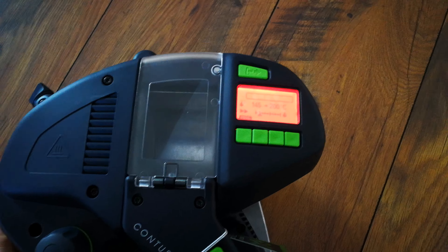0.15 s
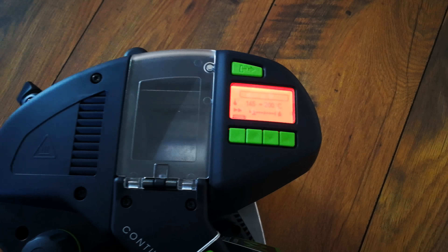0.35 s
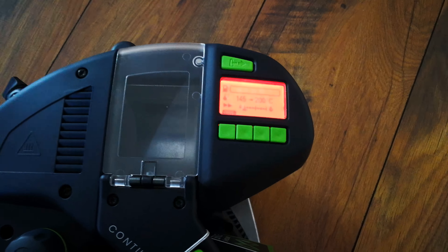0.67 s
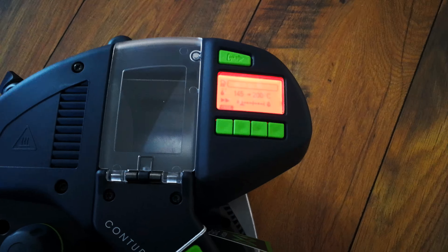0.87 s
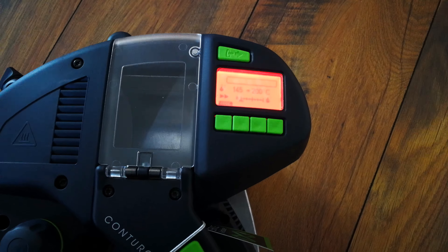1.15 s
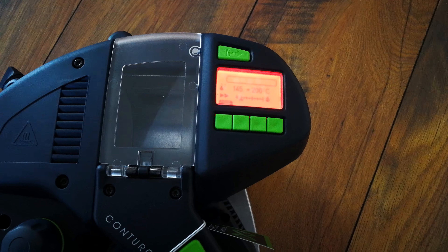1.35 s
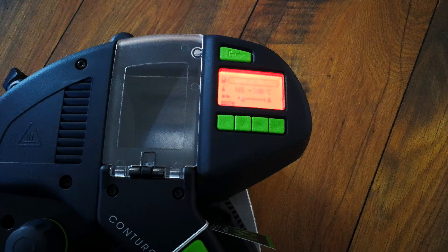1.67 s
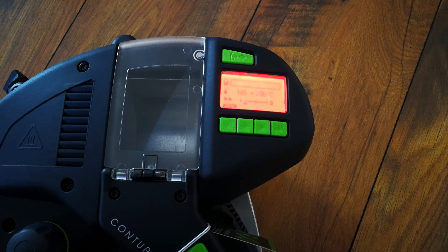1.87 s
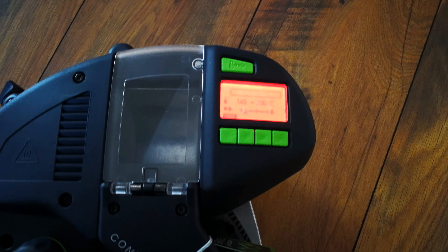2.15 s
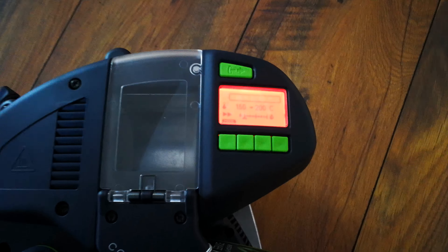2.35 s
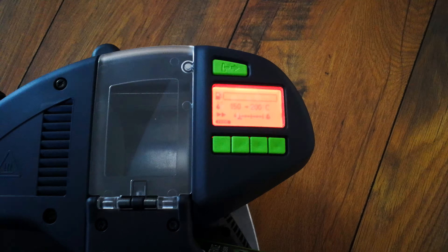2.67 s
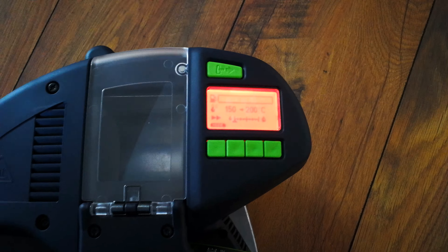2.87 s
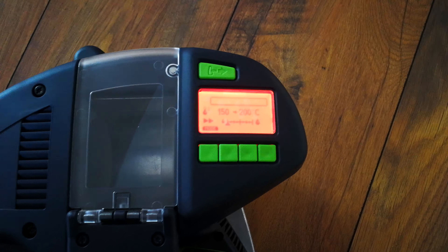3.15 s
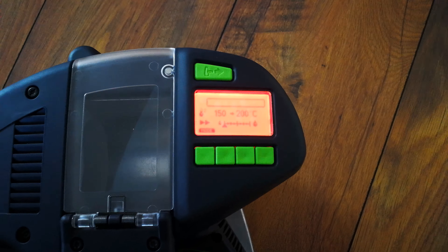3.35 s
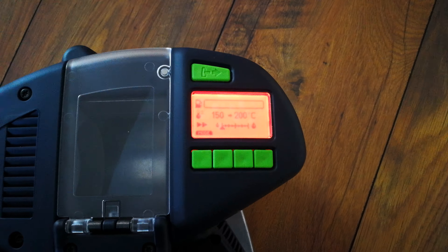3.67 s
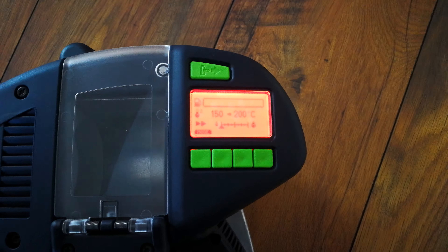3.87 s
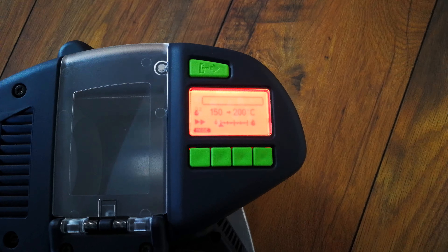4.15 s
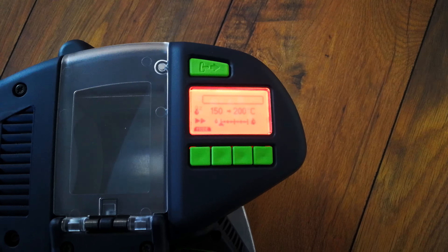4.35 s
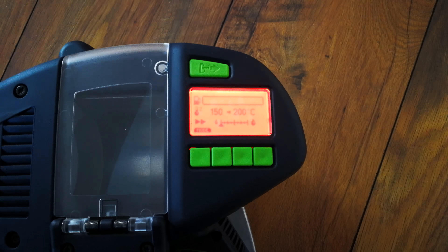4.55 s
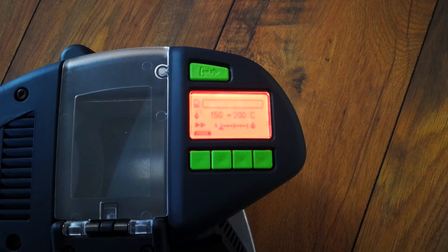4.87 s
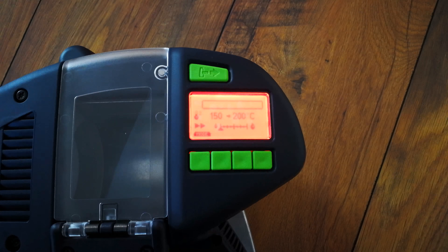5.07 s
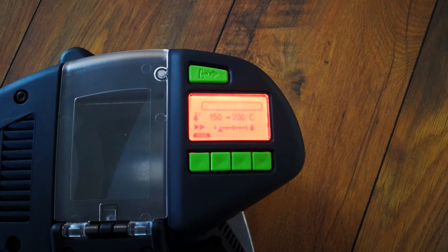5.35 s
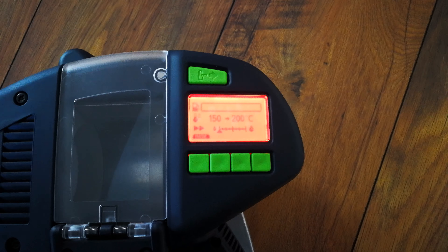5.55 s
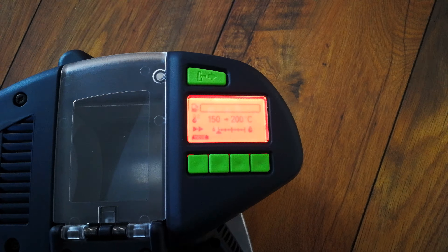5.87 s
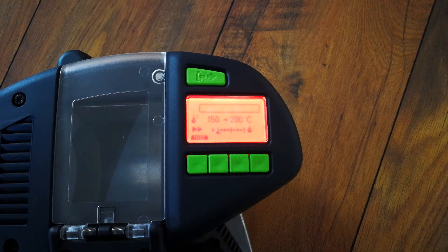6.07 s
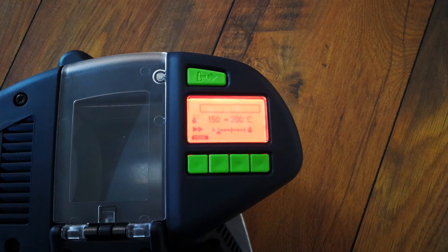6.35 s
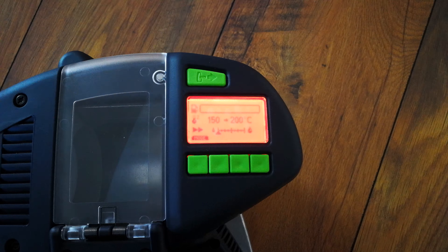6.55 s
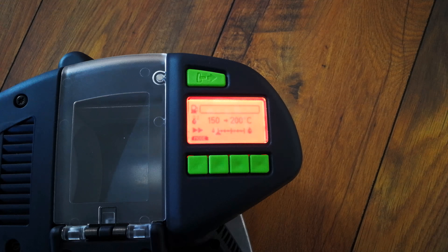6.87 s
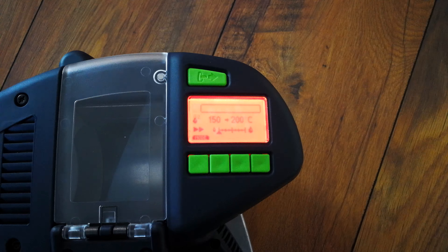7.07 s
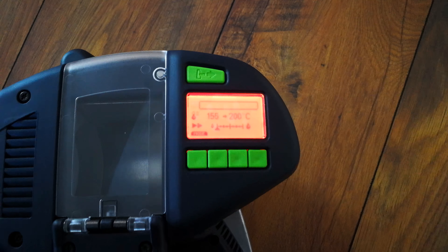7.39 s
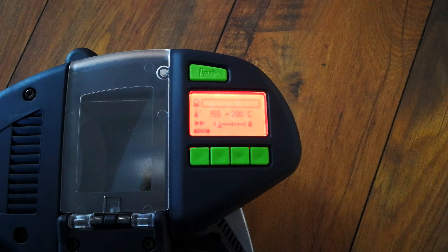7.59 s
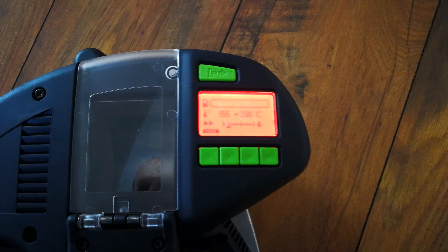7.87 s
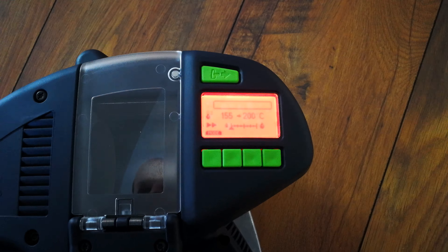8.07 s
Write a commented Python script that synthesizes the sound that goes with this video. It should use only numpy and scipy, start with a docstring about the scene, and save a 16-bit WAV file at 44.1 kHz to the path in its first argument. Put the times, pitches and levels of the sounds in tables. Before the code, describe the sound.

Small fans inside a plastic tool hiss steadily with a thin high whine, heard very close, after one soft low bump at the start.

```python
"""Two small fans whine and hiss inside a plastic tool on a wooden floor, heard by a phone held close above.
The whine is a set of pure tones at multiples of each fan's turning speed, shaken in level by gusts.
The hiss is random noise, coloured differently at the phone's two ports and shifting as the hand drifts.
Behind it lie low rumble, a wavering mains hum and buzz, and one bump of the hand on the phone."""
import sys
import numpy as np
from scipy.fft import rfft, irfft
from scipy.io import wavfile
from scipy.ndimage import uniform_filter1d

SR = 44100
rng = np.random.default_rng(int(sys.argv[2]) if len(sys.argv) > 2 else 0)


def file_out(sig):
    """Save sig as 16-bit WAV at sys.argv[1]."""
    # one column per channel
    cols = np.atleast_2d(sig).T
    # limit, then scale
    lim = np.clip(cols, -1, 1)
    pcm = np.round(lim * 32767).astype(np.int16)
    wavfile.write(sys.argv[1], SR, pcm)


N = 362502
T = np.arange(N) / SR  # time of each sample, s
HZ = np.arange(N // 2 + 1) * SR / N + 1e-3  # pitch of each frequency bin, kept above 0 for the logarithm

# In every table, port 0 is left and port 1 is right; a lead says how far the left port is ahead.

# --- room ---
MAINS_HZ, BUZZ_DB = 60, -78  # the buzz sounds at twice the mains pitch
RUMBLE_DB, SWELL_HALF_S = -79, .09
# low swells added to the steady rumble: [peak_s, peak_level_db]
RUMBLE_SWELLS = [(.11, -77), (1.37, -78), (2.15, -67), (3.57, -76), (5.24, -72), (6.2, -71), (6.66, -74),
                 (6.93, -65), (7.27, -65), (7.7, -76)]
# a hum that comes in, grows and stops
HUM_IDLE_DB, HUM_START_DB, HUM_RISE_DB_PER_S, HUM_WAVER_DB = -85, -76, 3, 2.5
HUM_ON_S, HUM_OFF_S, HUM_EDGE_S = 5.8, 7.83, .04
# one bump of the hand: [time_s, peak_level_db, push_length_s]
HAND_BUMP = (.1503, -50.5, .0017)
# steady bass noise of the room: [pitch_hz, level_db_per_hz]
ROOM_BASS = [(20, -110), (45, -97), (65, -95), (90, -99), (150, -104), (200, -130)]

# --- hiss ---
# air noise at each port before resonances: [pitch_hz, level_db_per_hz]
AIR_LEFT = [(150, -93), (300, -82), (450, -83.6), (600, -87.5), (800, -87.5), (1200, -83.2), (1800, -73.5),
            (2500, -71.5), (3500, -91), (5000, -90), (7000, -96.5), (10000, -97), (12500, -99.5),
            (15100, -106.1)]
AIR_RIGHT = [(150, -93), (300, -80.5), (450, -79.0), (600, -89.5), (800, -73.5), (1200, -79), (1800, -62.2),
             (2500, -73), (3500, -101.7), (5000, -90), (7000, -98.5), (10000, -85.5), (12500, -102.9),
             (15100, -105.8)]
# resonances and notches of housing, floor and phone body: [pitch_hz, width_hz, level_db]
RESONANCES_LEFT = [(237, 34, 3), (407, 41, 5.0), (961, 230, 7), (2180, 559, -13), (2296, 207, 10),
                   (3891, 480, 11), (4366, 423, -14), (4477, 609, 13.5), (10738, 3221, -7.5)]
RESONANCES_RIGHT = [(517, 104, -8.5), (1976, 56, -4.5), (2444, 269, -8), (2744, 490, -4), (3482, 278, 8),
                    (4561, 482, 6), (6522, 1148, 12), (9567, 532, -7.5), (10656, 527, -6)]
# standing waves between tool and floor: [port, pitch_hz, width_hz, level_db]
STANDING_WAVES = [(0, 330, 40, 2.2), (0, 640, 90, -.5), (0, 790, 60, 2.2), (0, 960, 90, 2.2),
                  (0, 1230, 80, 2.5), (0, 1380, 90, -2.2), (0, 1620, 100, 2.5), (0, 1700, 80, -1.5),
                  (0, 2190, 90, -1.7), (0, 2620, 70, -2.5), (0, 2790, 70, .5), (0, 3300, 90, 2.5),
                  (0, 5700, 1500, -.5), (0, 13300, 1500, 1), (0, 3130, 80, -2.2), (0, 6830, 250, 1.8),
                  (0, 7580, 300, 1.8), (0, 8630, 300, 2.5), (0, 9980, 300, 1.8), (1, 325, 40, 2.2),
                  (1, 612, 30, 4), (1, 650, 35, -6), (0, 650, 35, -4), (1, 720, 60, -2), (0, 4650, 300, 1),
                  (1, 950, 50, -3.5), (1, 1050, 60, 2), (1, 1125, 50, -5), (1, 1195, 60, 2.5),
                  (1, 1290, 60, -1.3), (1, 1720, 60, -2.2), (1, 1815, 80, 2.5), (1, 1925, 50, -2.5),
                  (1, 2020, 50, -3), (1, 2150, 60, -2.2), (1, 2080, 70, 2.2), (1, 2230, 70, 2.2),
                  (1, 4780, 120, -2.5), (1, 5950, 200, -2.5), (1, 7600, 600, 1.8), (1, 8230, 150, -2.2),
                  (1, 8700, 500, 1.5), (1, 12300, 300, 1.8), (1, 13900, 700, .9)]
# how alike the two ports are: [pitch_hz, likeness_0_to_1, lead_radians]
PORT_LIKENESS = [(60, .98, 1), (170, .95, 0), (350, .9, .1), (450, .82, .6), (560, .4, 1.53),
                 (700, .6, -0.2), (850, .66, 0.3), (1030, .52, 0), (1500, .68, 0.04), (2050, .25, 0.47),
                 (2300, .52, 1.57), (3200, .27, -0.1), (3850, .52, 1.5), (4150, .15, .5), (4550, .55, 1.6),
                 (5170, .15, 3), (6200, .35, 5.7), (7500, .28, 8.3), (8300, .15, 9), (8700, .45, 8.1),
                 (9350, .05, 7.5), (9900, .5, 7.3), (10800, .1, 8), (12000, .2, 9.4), (12550, .55, 9.4),
                 (13100, .1, 8.2), (13600, .25, 7.2), (15000, .05, 7)]

# --- the drifting hand ---
SLIDE_START_S, SLIDE_END_S = 2.0, 3.25  # the hand slides the phone over the grille once
# treble nearness around the slide: [before_db, after_db]
NEARNESS = (-1.05, .45)
# bands that follow the nearness: [port, pitch_hz, width_hz, slope_db_per_db]
NEARNESS_BANDS = [(0, 9000, 9000, 1.0), (1, 9000, 9000, 1.0), (1, 6500, 500, 1.1), (1, 7150, 350, -3.5),
                  (1, 1000, 150, -1.3), (1, 330, 200, .7), (0, 330, 200, .7), (0, 3200, 300, 1.6),
                  (0, 5700, 1500, .9), (0, 13300, 1500, 1), (1, 14000, 1200, 1.9), (0, 7900, 300, -.8),
                  (0, 2780, 80, -2.2), (0, 3370, 100, -1.2), (0, 1530, 80, 1), (1, 3760, 120, 1.5),
                  (1, 680, 120, 1.2), (1, 1875, 70, -2.2), (0, 2850, 70, -1.8), (1, 560, 90, .3)]
# change of the left hiss around 750 Hz: [time_s, level_db]
LEFT_LOW_HISS = [(0, -1.4), (1.5, -3.7), (3, -1), (4.1, 0), (5.7, 2.8), (7.5, -.1), (8.22, -.1)]
# change of the left hiss around 2400 Hz: [time_s, level_db]
LEFT_MID_HISS = [(0, -3), (1.9, -4.5), (2.5, 1), (3.4, 1.5), (5.5, 0), (8.22, 1)]
# hiss sharing the path of a nearby whine: [port, blade_multiple, pitch_hz, width_hz, share_of_db_change]
SHARED_PATHS = [(0, 2, 2070, 200, .35), (1, 2, 2050, 230, .42), (1, 2, 1875, 70, .45),
                (0, 3, 2920, 200, .3), (1, 3, 2970, 200, .5), (0, 4, 3900, 320, .8), (1, 4, 3850, 250, .5)]
WHINE_DIP_LIMIT_DB = -6  # a whine's dip below its mean counts only down to here for the hiss
FRESH_DB, FRESH_S = 3, .4  # the right hiss near 2100 Hz and the left near 3900 Hz start brighter, then settle
SWELL_DB, FLICKER_DB = .5, .9  # slow swelling around the whine, quicker flicker in the treble

# --- fans ---
BLADES = 7
SHAFT_HZ, SECOND_SHAFT_HZ = 139.04, 142.07  # turns per second
# whine of the first fan as the phone drifts:
# [time_s, multiple_2_left_db, multiple_2_right_db, multiple_3_left_db]
DRIFTING_WHINES = [(0, -50, -57, -64), (.25, -50, -54, -59), (.55, -48, -47, -54), (1.3, -47, -46, -58),
                   (1.75, -48, -48, -55), (2.25, -49, -46, -50), (2.9, -51, -39, -48.5),
                   (3.3, -53, -35, -48.5), (3.75, -53, -32.3, -54), (4.0, -55, -34, -59),
                   (4.48, -54, -35, -52), (4.73, -54, -37, -51), (6.0, -54.5, -37, -53),
                   (6.45, -54, -37, -57), (7.0, -54, -37, -52), (7.47, -51, -39, -57), (7.8, -50, -40, -53),
                   (8.22, -51, -41, -56)]
# whines set only by the slide, for multiple 3 right, 4 left and 4 right: [before_db, after_db]
SLIDE_WHINES = [(-57.5, -63), (-63.5, -58.7), (-83, -80)]
# blade tone of the second fan: [time_s, left_db, right_db, lead_radians]
SECOND_FAN = [(0, -53.5, -59, .7), (1.6, -55.5, -58, .7), (2.3, -54.5, -61, .7), (2.7, -52.5, -63, .5),
              (3.2, -54, -68, .3), (3.45, -59, -72, .2), (3.9, -59, -73, .1), (4.2, -54.5, -73, -.2),
              (5.6, -55.5, -73, -.1), (6.3, -53, -73, -.5), (6.8, -54.5, -73, -.5), (7.3, -58, -73, 0),
              (8.22, -57, -73, -.5)]
# lead for blade multiple 2: [time_s, lead_radians]
MULTIPLE_2_LEAD = [(0, 0), (1.2, -.35), (2.2, .1), (3.2, .2), (3.8, 0), (4.4, .2), (4.65, .85), (6, .65),
                   (8.22, .6)]
# lead for blade multiples 3 and 4 around the slide: [before_radians, after_radians]
SLIDE_LEADS = [(.65, 1.1), (-.8, 1.15)]
# weaker tones around the slide:
# [fan, shaft_multiple, left_before_db, left_after_db, right_before_db, right_after_db]
WEAK_TONES = [(0, 7, -68, -64.5, -69, -70), (0, 15, -78, -78, -70, -62), (0, 35, -80, -80, -80, -80),
              (0, 42, -83, -83, -79, -79), (1, 2, -73, -73, -73, -73), (1, 3, -71, -71, -71, -71),
              (1, 14, -78, -75, -60, -57), (1, 21, -73, -75, -82, -81)]
# The next three lists go: multiples 2, 3 and 4 of the first fan, then the second fan.
# strength of the gusts on each whine: [shake_db]
GUST_SHAKE = [.3, .7, 1.8, 1.2]
# pace of the gusts on each whine: [new_levels_per_s]
GUST_PACE = [14, 14, 30, 16]
# slow wander of each whine as the hand trembles: [wander_db]
HAND_WANDER = [.3, .6, .3, .6]

# --- phone ---
TOP_HZ, EDGE_HZ, EDGE_DB = 15640, 15150, -5


def undb(db):
    """Turn decibels into a plain gain."""
    return 10 ** (np.asarray(db) / 20)


def curves(table):
    """Join the points of each table column with straight lines over time."""
    s, *columns = np.transpose(table)
    return [np.interp(T, s, column) for column in columns]


def over_hz(table):
    """Join the points of each table column over pitch, on a log scale as in hearing."""
    hz, *columns = np.transpose(table)
    return [np.interp(np.log(HZ), np.log(hz), column) for column in columns]


def walk(rate):
    """Random level, drawn anew `rate` times a second and smoothed twice; its typical spread is 1."""
    hold = int(SR / rate)
    steps = np.repeat(rng.standard_normal(N // hold + 1), hold)
    smooth = uniform_filter1d(uniform_filter1d(steps, hold), hold)[:N]
    return smooth / smooth.std()


def white():
    """Spectrum of even noise at 0 dB per Hz."""
    return rfft(rng.standard_normal(N)) * np.sqrt(SR / 2)


def band(sound, hz, width):
    """Keep only a soft-edged band of a sound."""
    return irfft(rfft(sound) * np.exp(-2 * ((HZ - hz) / width) ** 2), N)


def slid(before, after):
    """Move smoothly from one value to the other while the hand slides the phone."""
    u = np.clip((T - SLIDE_START_S) / (SLIDE_END_S - SLIDE_START_S), 0, 1)
    return before + (after - before) * u ** 2 * (3 - 2 * u)


def rumble():
    """Very low noise, steady with short bell-shaped swells."""
    noise = band(rng.standard_normal(N), 32, 32)
    swells = sum(undb(db) * np.exp(-.5 * ((T - at) / SWELL_HALF_S) ** 2) for at, db in RUMBLE_SWELLS)
    return (undb(RUMBLE_DB) + swells) * noise / noise.std()


def mains_hum():
    """A tone near the mains pitch with unsteady level and phase: faint, then growing until it stops."""
    tone = undb(HUM_WAVER_DB * walk(8)) * np.sin(2 * np.pi * MAINS_HZ * T + 1.6 * walk(5))
    on = (np.tanh((T - HUM_ON_S) / HUM_EDGE_S) - np.tanh((T - HUM_OFF_S) / HUM_EDGE_S)) / 2
    growing = undb(HUM_START_DB + HUM_RISE_DB_PER_S * (T - HUM_ON_S))
    return (undb(HUM_IDLE_DB) + on * growing) * tone / tone.std()


def mains_buzz():
    """A tone at twice the mains pitch, its level wavering a little."""
    return np.sqrt(2) * undb(BUZZ_DB + 1.5 * walk(3)) * np.sin(2 * np.pi * 2 * MAINS_HZ * T)


def hand_bump():
    """The hand bumps the phone: one push in, then out."""
    at, peak_db, push = HAND_BUMP
    u = (T - at) / push
    return undb(peak_db) * u * np.exp(.5 - u ** 2 / 2)


def bass_floor():
    """Steady bass noise, mostly common to both ports with a little difference between them."""
    gain = undb(over_hz(ROOM_BASS)[0])
    common = irfft(white() * gain, N)
    difference = irfft(white() * gain, N)
    return common + .15 * difference * np.array([[1], [-1]])


def room():
    """All background sounds, nearly the same at both ports."""
    return rumble() + mains_hum() + mains_buzz() + hand_bump() + bass_floor()


def hiss():
    """Turbulent air, partly common to both ports, coloured by each port's resonances."""
    like, lead = over_hz(PORT_LIKENESS)
    like = np.clip(like, 0, 1)
    left = white()
    right = like * left * np.exp(-1j * lead) + np.sqrt(1 - like ** 2) * white()
    ports = ((left, AIR_LEFT, RESONANCES_LEFT), (right, AIR_RIGHT, RESONANCES_RIGHT))
    fall = 1 / np.sqrt(1 + (110 / HZ) ** 8)  # small fans give no deep bass
    out = []
    for port, (air, base, body) in enumerate(ports):
        modes = list(body) + [row[1:] for row in STANDING_WAVES if row[0] == port]
        db = over_hz(base)[0]
        for hz, width, mode_db in modes:
            db = db + mode_db / (1 + (2 * (HZ - hz) / width) ** 2)
        out.append(irfft(air * undb(db) * fall, N))
    return np.array(out)


def whines():
    """Left and right dB of blade multiples 2, 3 and 4, then of the second fan's blade tone."""
    return curves(DRIFTING_WHINES) + [slid(*row) for row in SLIDE_WHINES] + curves(SECOND_FAN)[:2]


def hand_moves():
    """List the bands that swell or sink as the moving phone shifts the standing waves."""
    near = slid(*NEARNESS)
    fresh = FRESH_DB * np.exp(-(T / FRESH_S) ** 2)
    moves = [(0, 750, 170, curves(LEFT_LOW_HISS)[0]), (0, 2400, 260, curves(LEFT_MID_HISS)[0])]
    moves += [(1, 2100, 250, fresh), (0, 3900, 320, fresh)]
    moves += [(int(port), hz, width, slope * near) for port, hz, width, slope in NEARNESS_BANDS]
    whine = whines()
    for port, multiple, hz, width, share in SHARED_PATHS:
        port = int(port)
        db = uniform_filter1d(whine[2 * (int(multiple) - 2) + port], SR // 2)  # smoothed over half a second
        moves.append((port, hz, width, share * np.maximum(db - db.mean(), WHINE_DIP_LIMIT_DB)))
    return moves


def restless_bands():
    """Bands of the hiss that rise and fall at random, each on its own but alike at both ports."""
    moves = []
    for hz in 3500 * 2 ** (np.arange(7) / 3):  # steps of a third octave
        flicker = FLICKER_DB * walk(11)
        moves += [(port, hz, hz / 6, flicker) for port in (0, 1)]
    for hz in range(1200, 2800, 200):
        swell = SWELL_DB * walk(2.5)
        moves += [(port, hz, 130, swell) for port in (0, 1)]
    return moves


def drifted(air):
    """Raise or lower single bands of the hiss over time by adding or taking away part of each."""
    out = air.copy()
    for port, hz, width, db in hand_moves() + restless_bands():
        out[port] += (undb(db) - 1) * band(air[port], hz, width)
    return out


def shaft_angle(hz, waver):
    """Angle of a turning shaft in radians; its speed wavers by a small fraction, slowly and quickly."""
    speed = hz * (1 + waver * (walk(1.5) + walk(12)))
    return 2 * np.pi * np.cumsum(speed) / SR


def fans():
    """Spinning blades and shafts give tones at multiples of the turning speed; gusts shake their levels."""
    angles = [shaft_angle(SHAFT_HZ, .00013), shaft_angle(SECOND_SHAFT_HZ, .0005)]
    tremble = [db * walk(3) for db in HAND_WANDER]
    whine = [db + tremble[i // 2] for i, db in enumerate(whines())]
    leads = curves(MULTIPLE_2_LEAD) + [slid(*row) for row in SLIDE_LEADS] + curves(SECOND_FAN)[2:]
    tones = []
    for i, (fan, multiple) in enumerate([(0, 2), (0, 3), (0, 4), (1, 1)]):
        left_db, right_db = whine[2 * i], whine[2 * i + 1]
        tones.append((fan, multiple * BLADES, left_db, right_db, leads[i], GUST_SHAKE[i], GUST_PACE[i]))
    for fan, multiple, *db in WEAK_TONES:
        tones.append((fan, multiple, slid(*db[:2]), slid(*db[2:]), .5, 2.5, 14))
    out = np.zeros((2, N))
    for fan, multiple, left_db, right_db, lead, shake_db, pace in tones:
        phase = int(multiple) * angles[int(fan)] + rng.uniform(0, 2 * np.pi)
        gust = np.sqrt(2) * undb(shake_db * walk(pace))  # root 2 turns average level into sine height
        left = undb(left_db) * np.sin(phase + lead)
        right = undb(right_db) * np.sin(phase)
        out += gust * np.array([left, right])
    return out


def scene():
    """Room, drifting hiss and fan tones together."""
    return room() + drifted(hiss()) + fans()


def record(dry):
    """The phone thins the last treble and cuts the top off steeply."""
    edge = undb(EDGE_DB / (1 + np.exp((EDGE_HZ - HZ) / 30)))
    cut = 1 / np.sqrt(1 + (HZ / TOP_HZ) ** 2000)
    return irfft(rfft(dry) * edge * cut, N)


dry = scene()
out = record(dry)
file_out(out)
```